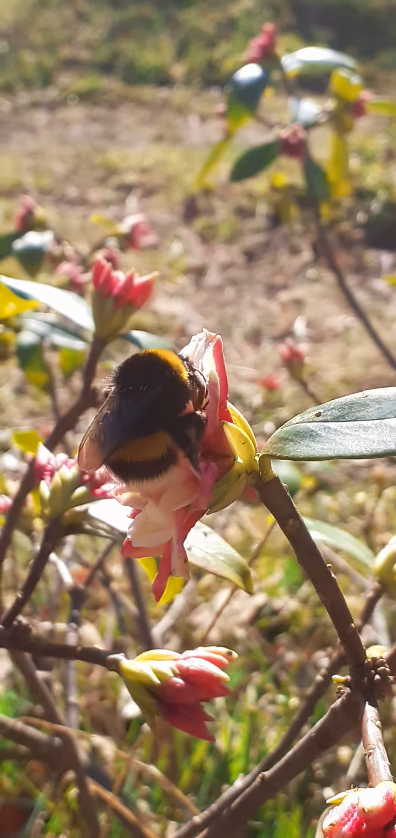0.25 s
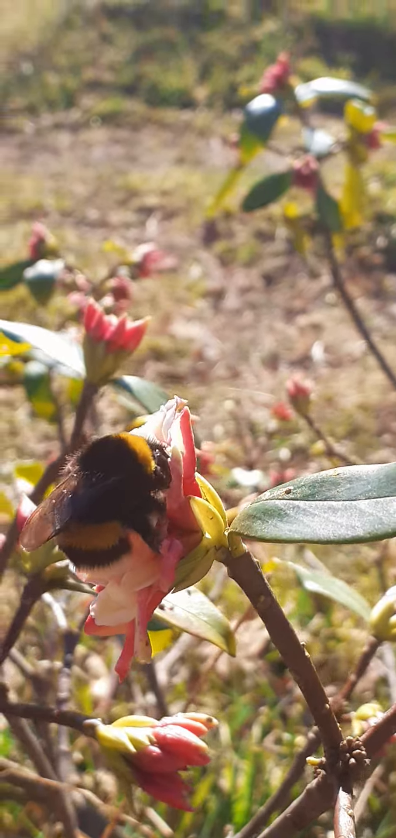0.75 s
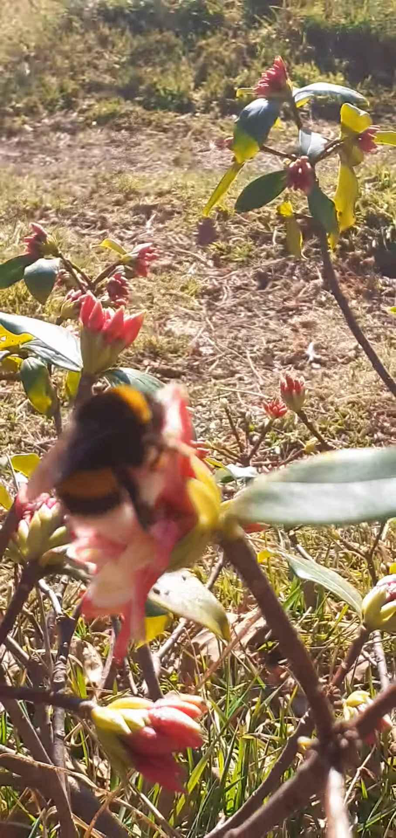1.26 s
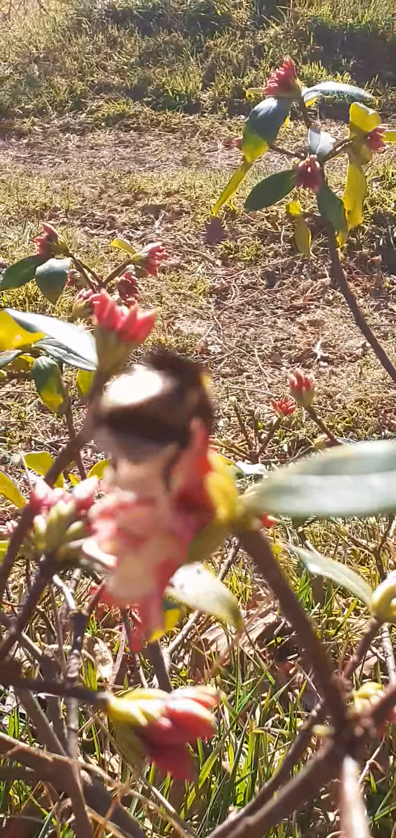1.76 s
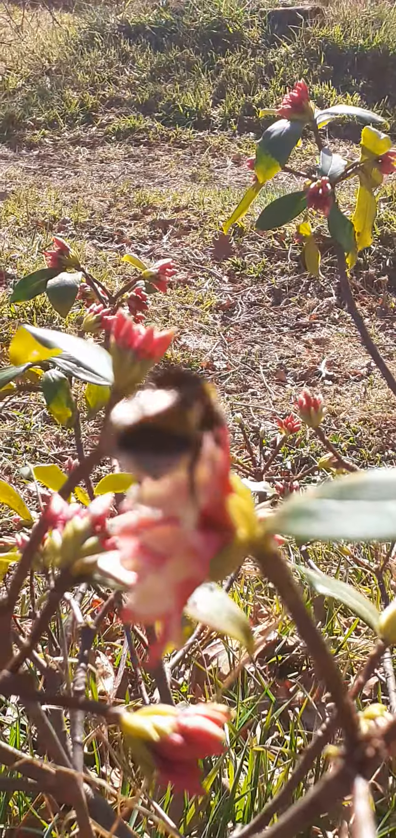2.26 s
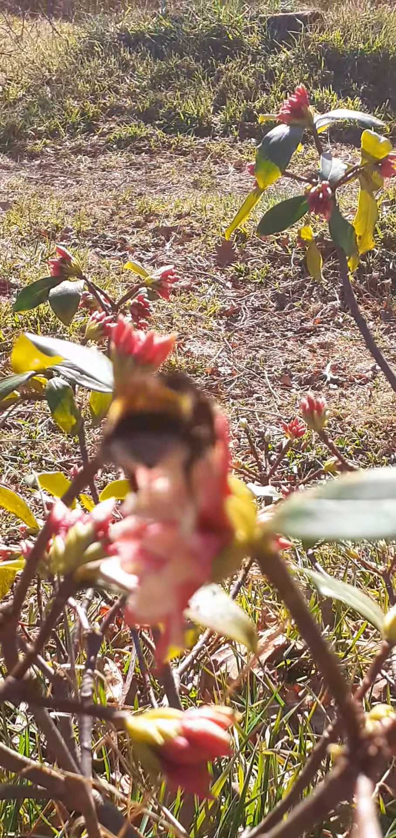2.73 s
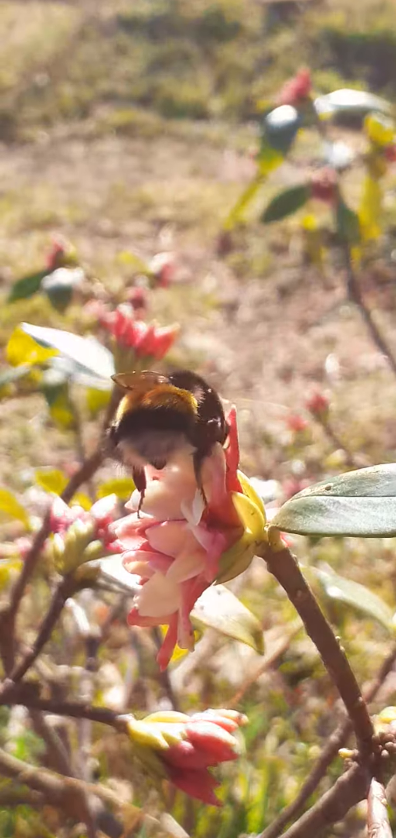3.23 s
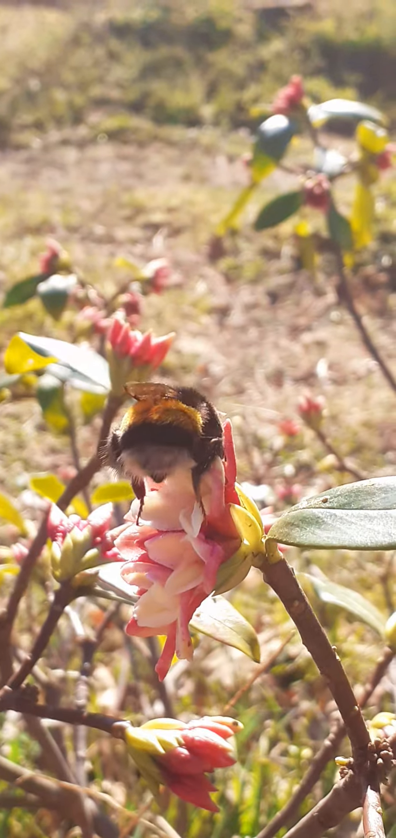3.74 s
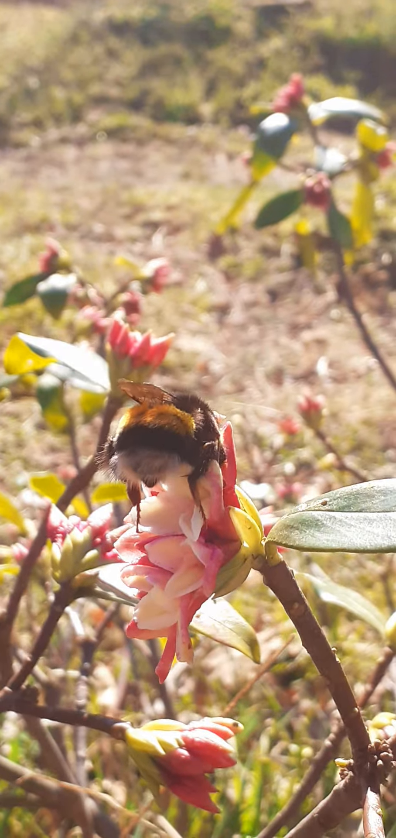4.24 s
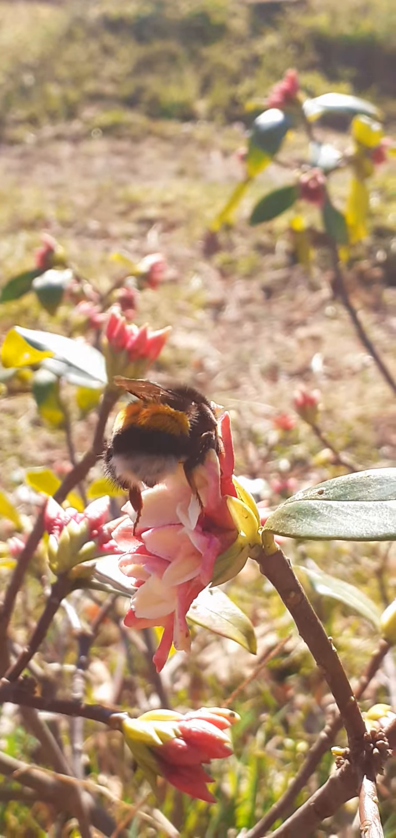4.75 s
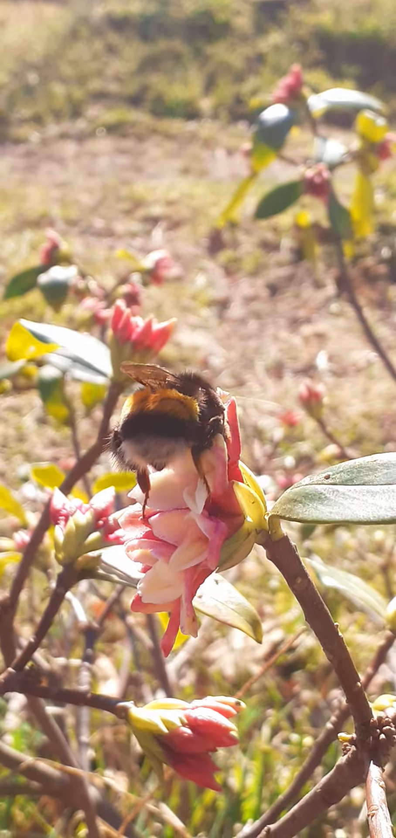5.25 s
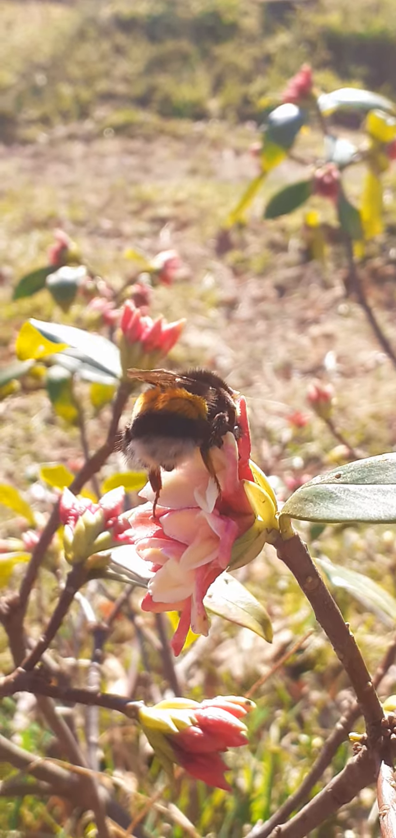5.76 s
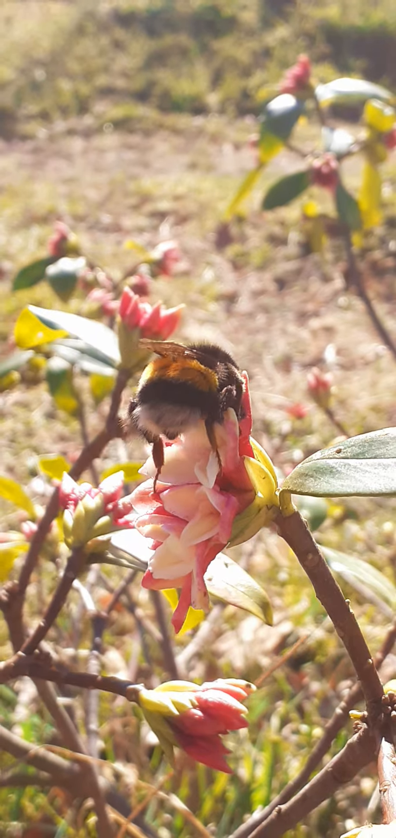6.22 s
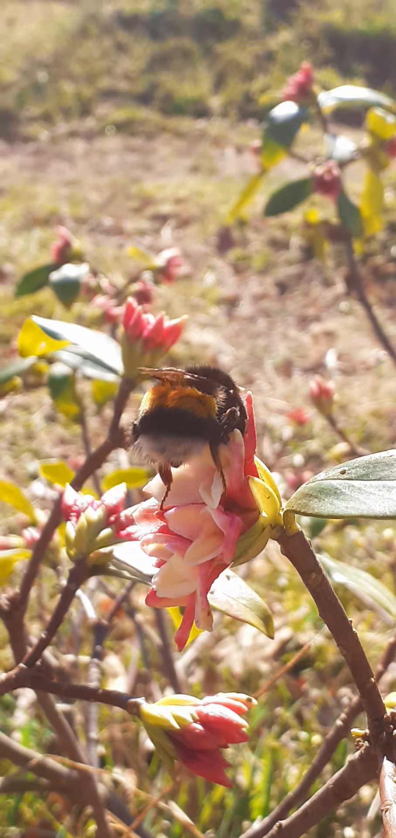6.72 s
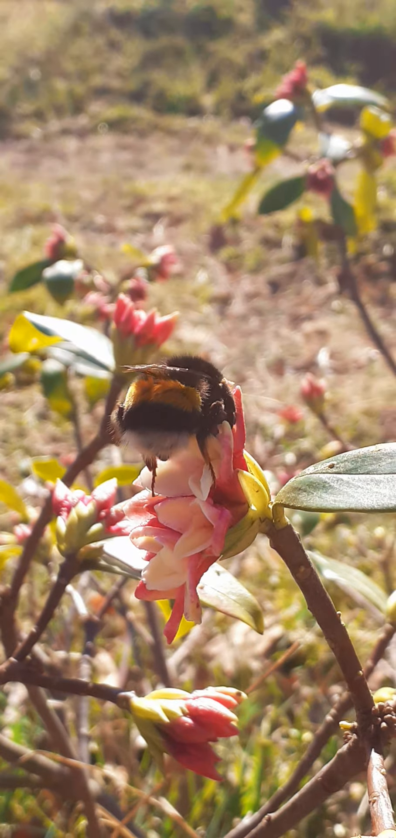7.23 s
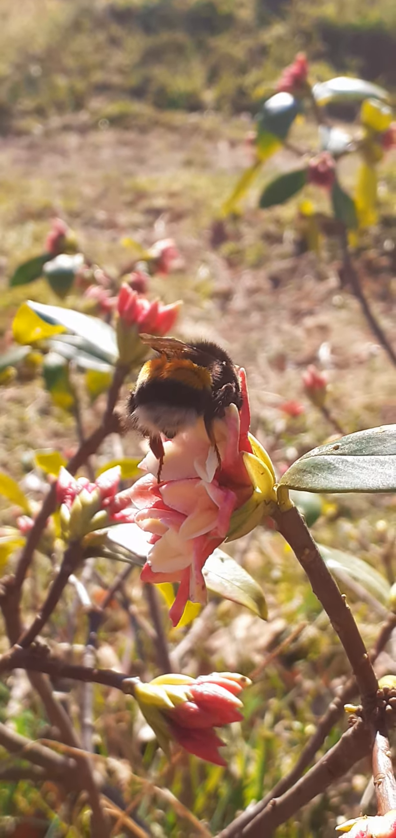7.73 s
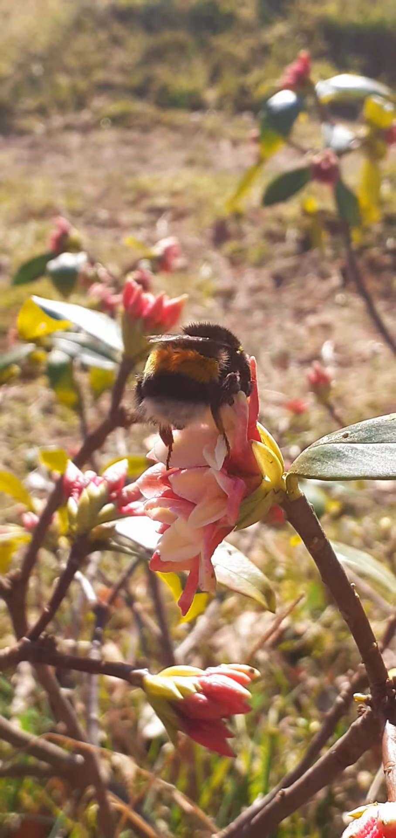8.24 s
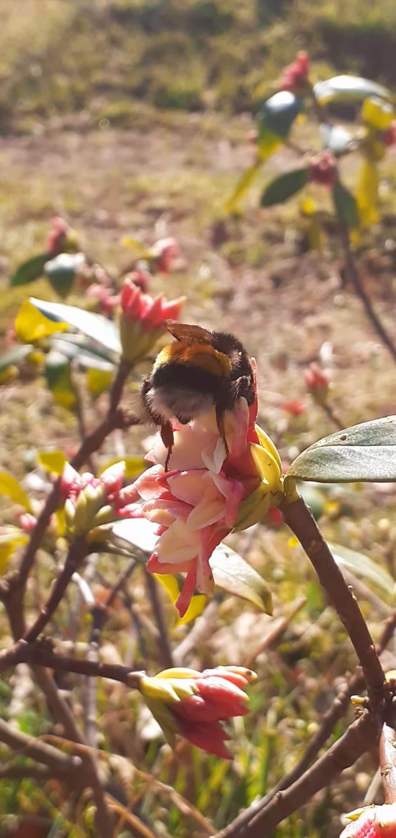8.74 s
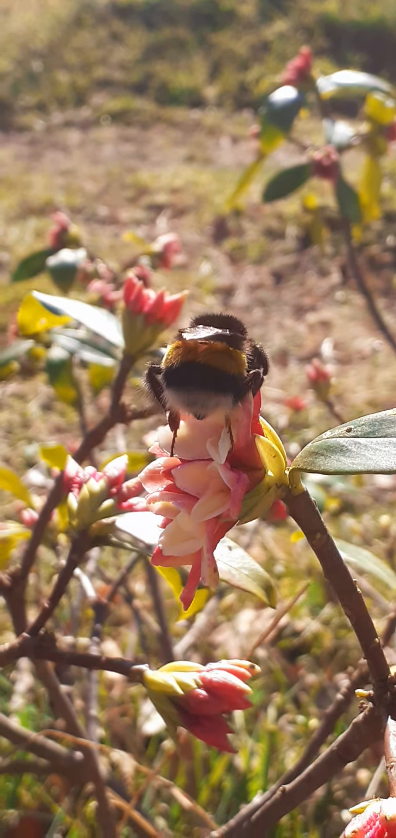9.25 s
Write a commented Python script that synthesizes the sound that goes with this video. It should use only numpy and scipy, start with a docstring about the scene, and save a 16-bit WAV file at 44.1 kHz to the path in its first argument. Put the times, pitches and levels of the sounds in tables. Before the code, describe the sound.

In an open garden, beside a bumblebee on a pink blossom, the main sound is a far engine, probably an aircraft: a deep, muffled rumble and drone with slight flutter. It starts very quietly and rises over the first second. Sharp, dry taps strike the left microphone at about 0.2, 0.3, 0.5 and 0.8 s, with short low thumps and very faint scuffs; a tiny scuff follows at 1.3 s. Weaker taps come at 2.4 and 2.6 s, the last with a soft low knock in both channels. Fine microphone hiss rises slightly around 2.1 s and stays. From about 4.5 s the engine grows fuller, wavering in strength, its faint thin whine becoming clearer and slowly sinking in pitch. Barely audible leaf rustles pass at 6.1 and 6.5 s. The drone eases near 7 s, continues unevenly, then surges to its loudest from 9.1 s until the cut at about 9.5 s.

```python
"""A far engine, probably an aircraft, rumbles and swells, joined early on by a few sharp taps.
The engine is noise in three pitch bands, with garden air above; its thin whine is one tone that later sinks.
Taps are sudden pushes on the left microphone port, and one hand nudge is a fading low tone.
Patches of filtered noise make faint scuffs after the first taps, then soft leaf rustles.
Behind them, steady noise makes both microphones hiss."""
import sys
import numpy as np
from scipy import signal
from scipy.fft import rfft, irfft
from scipy.io import wavfile

SR = 44100
rng = np.random.default_rng(int(sys.argv[2]) if len(sys.argv) > 2 else 0)


def transcribe(u):
    """Save the signal u as a 16-bit wav file named by the first command-line argument.

    u: samples, shape (n,) or (channels, n), limited to [-1, 1]; the rate is SR.
    q: integer samples, one column per channel.
    """
    v = np.clip(np.atleast_2d(u).T, -1, 1)
    q = np.round(v * 32767).astype(np.int16)
    wavfile.write(sys.argv[1], SR, q)


N = 418068  # length in samples

# How the far engine swells, before small trims for each band:
# time_s, rumble_db, drone_db, rush_db
ENGINE_SWELL = [(0, -44, -43, -55), (0.65, -38.5, -39, -54.0), (1.3, -37, -40.5, -53.5),
                (1.7, -42, -40.5, -55.0), (2.35, -36.0, -36.5, -50), (2.85, -38.5, -37.5, -50),
                (3.05, -36.5, -33.5, -46.5), (3.65, -38, -34, -50), (4.25, -36.5, -38.5, -50),
                (4.9, -32, -32.5, -42.5), (5.66, -32, -30.5, -40.5), (5.9, -27.0, -37.5, -43.5),
                (6.24, -28.5, -30.5, -42), (6.88, -35, -36.0, -43.5), (7.12, -32, -32, -42.5),
                (7.9, -31, -35.5, -45), (8.72, -34, -34.5, -41), (9.1, -31, -31.0, -39.0),
                (9.32, -23, -24, -36.5), (9.46, -28.5, -19.5, -36)]
# Tone colour of the engine noise and the air above it; each band is levelled again later:
# pitch_hz, relative_level_db
ENGINE_COLOUR = [(25, -30.5), (40, -12), (70, -0.5), (120, 3), (200, -1), (330, -8), (440, -17), (630, -18),
                 (1000, -28.5), (1300, -40), (1700, -44.5), (2150, -55), (2600, -59), (3200, -76.5),
                 (6000, -90.5)]
# How the two microphone ports hear the engine noise and the air:
# pitch_hz, left_minus_right_db, left_lead_rad, likeness (0 to 1)
PORT_DIFFERENCES = [(60, 0, -0.01, 0.99), (142, 0.65, 0.03, 1.0), (218, -2, 0.0045, 0.99),
                    (277, -4.5, 0.66, 0.98), (390, -2.9, 1.23, 0.66), (500, 7.5, 2.06, 0.5),
                    (624, 6, 0.59, 1), (890, 0.5, 1.36, 1), (1130, 2, 1.45, 0.1), (1560, -9, 1.2, 0.5),
                    (2300, -7, 1.4, 0), (3500, 5.5, -1.67, 0.22)]
# Narrow phone resonances that colour the engine noise and, more weakly, the taps:
# pitch_hz, width_hz, boost_db
PHONE_RESONANCES = [(76, 12, 4.5), (111.2, 21, 6.5), (150.4, 11, 6.5), (177, 5.9, 0), (256, 18, 2.5),
                    (311, 16.3, 7.5), (361.8, 16, 4.5), (503, 18, 7)]
# Taps on the left port, before a shared boost:
# start_s, relative_strength_db
PORT_TAPS = [(0.210, -20), (0.2124, -24.5), (0.3208, -20), (0.4752, -12), (0.511, -25.5), (0.517, -10.5),
             (0.552, -24.5), (0.7756, -11), (2.383, -31), (2.6308, -39), (2.6357, -25.5)]
# How the port answers a tap; the peak is levelled later:
# pitch_hz, relative_level_db
TAP_COLOUR = [(20, -32), (40, -13), (65, 2), (110, 0.5), (170, -3.5), (260, -3.5), (340, -2), (430, -10),
              (1000, -18), (2200, -31), (6500, -46.5), (9400, -63), (12500, -47), (16000, -52)]
# Tone colour of the hiss, before the low pitches are cut and the level is set:
# pitch_hz, left_relative_db, right_relative_db
HISS_COLOUR = [(3180, -3.5, -7.5), (4300, -4.5, -4), (5500, -6, -6.5), (7000, -2.5, -6.5), (8540, -1, 0.5),
               (9900, -3.5, -12), (12000, -0.5, -8.5), (15000, -1.5, -7.5)]
# Faint scuffs after the first taps (first two rows), then soft leaf rustles, before uneven patches are added:
# start_s, level_db, decay_s
SCUFFS_AND_RUSTLES = [(0.27, -73, 0.23), (0.57, -79, 0.17), (1.283, -71, .05), (6.07, -77, .2),
                      (6.45, -77, .1)]

# The whine's level is for the engine's mean rush, before it passes; it follows the rush in dB per dB.
WHINE_HZ, SINKS_FROM_S, SINK_HZ_PER_S = 1129, 4.4, 6.5
WHINE_DB, WHINE_FOLLOW = -66, 0.6
# Once the pitch starts to sink, the turbine comes through more clearly.
PASSING_DB, PASSING_RISE_S = 5.5, 0.52
# The hiss starts at HISS_DB, rises once and stays up.
HISS_DB, HISS_RISE_DB, HISS_RISE_S, HISS_RISE_LENGTH_S = -69.5, 3, 2.04, 0.34
START_S, TOP_HZ = 0.008, 15800  # fade-in length, upper limit of the sound


def undb(db):
    """Turn decibels into a plain gain."""
    return 10 ** (np.asarray(db) / 20)


def unit(x):
    """Scale a sound to an average (rms) strength of 1."""
    return x / np.sqrt(np.mean(x ** 2))


def seconds():
    """The time of every sample, in seconds."""
    return np.arange(N) / SR


def curves(table):
    """Join the points of a time table into one value per sample for each column."""
    time_s, *columns = np.transpose(table)
    return [np.interp(seconds(), time_s, column) for column in columns]


def bins():
    """The pitches (Hz) of a full-length spectrum, never below 1 Hz."""
    return np.maximum(np.arange(N // 2 + 1) * SR / N, 1)


def spectra(table):
    """Join the points of a pitch table along a log pitch scale, one value per bin."""
    pitch_hz, *columns = np.transpose(table)
    return [np.interp(np.log(bins()), np.log(pitch_hz), column) for column in columns]


def white():
    """The spectrum of fresh white noise, equally strong on average at all pitches."""
    return rfft(rng.standard_normal(N))


def walk(rate):
    """A smooth random curve with spread 1 that changes about rate times a second."""
    return unit(irfft(white() * np.exp(-(bins() / rate) ** 2), N))


def resonance_db():
    """Add up the phone's narrow resonance peaks, in dB."""
    return sum(db / (1 + (2 * (bins() - hz) / width) ** 2) for hz, width, db in PHONE_RESONANCES)


def causal(db, size=4096):
    """Make the most prompt response to a push with this tone colour (minimum phase)."""
    cepstrum = irfft(np.log(undb(db)), N)
    # fold the half before time zero onto the half after it
    cepstrum[1:N // 2] *= 2
    cepstrum[N // 2 + 1:] = 0
    response = irfft(np.exp(rfft(cepstrum)), N)
    return response[:size]


def at_ports():
    """Mix shared and separate noise, so that the two ports are as alike as the table says."""
    balance_db, lead_rad, likeness = spectra(PORT_DIFFERENCES)
    likeness = np.clip(likeness, 0, 1)
    side = np.array([[1], [-1]])  # left, right
    shared = np.sqrt(likeness) * white() * np.exp(0.5j * side * lead_rad)
    separate = np.sqrt(1 - likeness) * np.array([white(), white()])
    gain = undb(side * balance_db / 2)
    return (shared + separate) * gain / np.sqrt(np.mean(gain ** 2, axis=0))


def roar_and_air(low_hz=170, high_hz=420, top_hz=1200, rumble_db=0, drone_db=0.32, rush_db=1.7,
                 air_db=-64, air_follow=0.23, flutter_db=0.74, flutter_rate=14):
    """Engine noise in three bands, with garden air above; the level of each flutters."""
    sound = at_ports() * undb(spectra(ENGINE_COLOUR)[0] + resonance_db())
    below_low, below_high, below_top = (
        1 / (1 + (bins() / hz) ** 14) for hz in (low_hz, high_hz, top_hz))
    bands = below_low, below_high - below_low, below_top - below_high, 1 - below_top
    rumble, drone, rush = curves(ENGINE_SWELL)
    # the airy top is mostly steady garden air, so it follows the swell only weakly
    air = air_db + air_follow * (rush - np.mean(rush))
    levels_db = rumble + rumble_db, drone + drone_db, rush + rush_db, air
    out = 0
    for band, level_db in zip(bands, levels_db):
        fluttering_db = level_db + flutter_db * walk(flutter_rate)
        out = out + unit(irfft(sound * band, N)) * undb(fluttering_db)
    return out


def whine(waver=0.0026, waver_rate=35, drift=0.001995, drift_rate=1.2,
          scatter=1.4, scatter_rate=12, left_db=-2, right_db=1, left_lead_rad=1.16):
    """One turbine tone sinks as the engine passes; shifting sound paths make it waver and fade."""
    rush = curves(ENGINE_SWELL)[2]
    passing_s = np.maximum(seconds() - SINKS_FROM_S, 0)
    swell_db = WHINE_FOLLOW * (rush - np.mean(rush))
    clearer_db = PASSING_DB * np.minimum(passing_s / PASSING_RISE_S, 1)
    level_db = WHINE_DB + swell_db + clearer_db
    sinking_hz = WHINE_HZ - SINK_HZ_PER_S * passing_s
    # waver and drift are fractions of the pitch
    pitch_hz = sinking_hz * (1 + waver * walk(waver_rate) + drift * walk(drift_rate))
    phase = 2 * np.pi * np.cumsum(pitch_hz) / SR
    # a steady direct path plus randomly changing ones
    paths = 1 + scatter * (walk(scatter_rate) + 1j * walk(scatter_rate)) / np.sqrt(2)
    tone = np.sqrt(2 / (1 + scatter ** 2)) * paths * np.exp(1j * phase) * undb(level_db)
    left = undb(left_db) * tone * np.exp(1j * left_lead_rad)
    right = undb(right_db) * tone
    return np.imag([left, right])


def taps(tap_db=12.0, ring=0.37, release_db=-65, release_s=0.12, release_hz=3500):
    """A push on the left port gives a sharp edge and a short low thump;
    the phone's noise reduction then lets a faint hiss through."""
    pushes = np.zeros(N)
    for start_s, strength_db in PORT_TAPS:
        pushes[int(start_s * SR)] += undb(strength_db + tap_db)
    response = causal(spectra(TAP_COLOUR)[0] + ring * resonance_db())
    response = response / np.max(np.abs(response))
    thumps = signal.fftconvolve(pushes, response)[:N]
    # the hiss let through is about equally faint after light and heavy taps
    t = seconds()
    since_tap_s = t - np.maximum.accumulate(np.where(pushes > 0, t, -np.inf))
    fading = np.exp(-since_tap_s / release_s)
    soft_noise = unit(irfft(white() / (1 + (bins() / release_hz) ** 2), N))
    released_hiss = soft_noise * fading * undb(release_db)
    return np.array([thumps + released_hiss, np.zeros(N)])


def bump(pitch_hz=125, decay_s=0.032, level_db=-21):
    """The hand nudges the phone once: a fading low tone makes a soft knock in both microphones."""
    start_s = PORT_TAPS[-1][0] + 0.005  # right after the last tap
    age_s = np.maximum(seconds() - start_s, 0)
    return undb(level_db) * np.sin(2 * np.pi * pitch_hz * age_s) * np.exp(-age_s / decay_s)


def scuffs_and_leaves(centre_hz=4200, spread=0.82, patchy_db=3.0, patchy_rate=40):
    """Faint scuffs, then soft leaf rustles: uneven noise that starts at once and dies away."""
    band = np.exp(-(np.log(bins() / centre_hz) / spread) ** 2)  # spread in natural-log pitch
    t = seconds()
    strength = sum(undb(level_db) * (t >= start_s) * np.exp(-np.abs(t - start_s) / decay_s)
                   for start_s, level_db, decay_s in SCUFFS_AND_RUSTLES)
    noise = unit(irfft(np.array([white(), white()]) * band, N))
    return noise * strength * undb(patchy_db * walk(patchy_rate))


def hiss(edge_hz=1800):
    """Each microphone makes its own smooth noise, a little fainter at first."""
    treble = 1 / (1 + (edge_hz / bins()) ** 2)
    noise = np.array([irfft(white() * treble * undb(db), N) for db in spectra(HISS_COLOUR)])
    risen = np.clip((seconds() - HISS_RISE_S) / HISS_RISE_LENGTH_S, 0, 1)
    return unit(noise) * undb(HISS_DB + HISS_RISE_DB * risen)


def scene():
    """Add the far engine and air, the near handling sounds, the leaves and the microphone hiss."""
    return roar_and_air() + whine() + taps() + bump() + scuffs_and_leaves() + hiss()


def record(dry):
    """A very short fade-in avoids a click at the start; the phone clips at full scale and cuts the top pitches."""
    fade_in = np.sin(np.pi / 2 * np.minimum(seconds() / START_S, 1)) ** 2
    clipped = np.clip(dry * fade_in, -1, 1)
    top_cut = signal.ellip(10, 0.2, 70, TOP_HZ, fs=SR, output="sos")
    return signal.sosfilt(top_cut, clipped)


dry = scene()
out = record(dry)
transcribe(out)
```